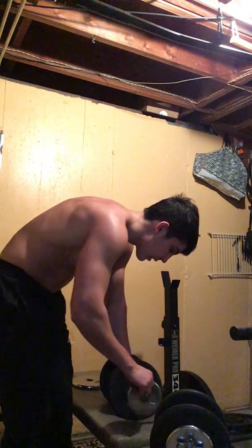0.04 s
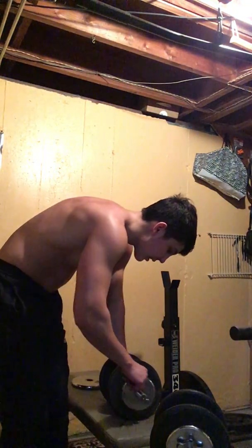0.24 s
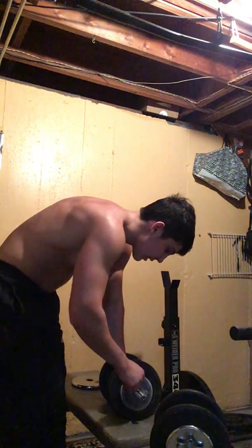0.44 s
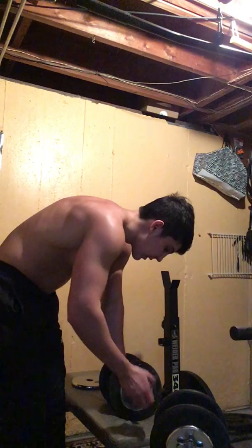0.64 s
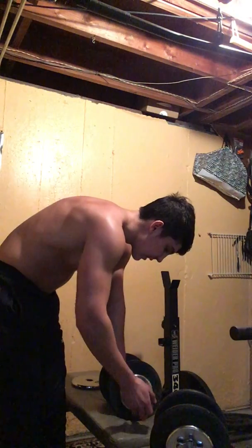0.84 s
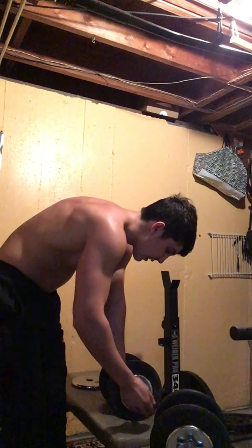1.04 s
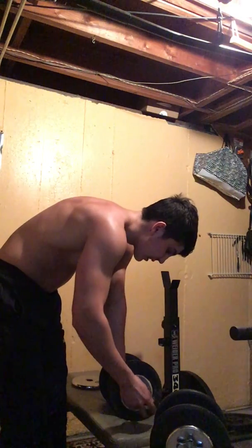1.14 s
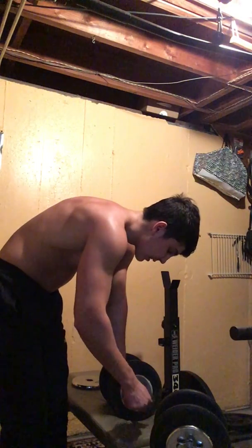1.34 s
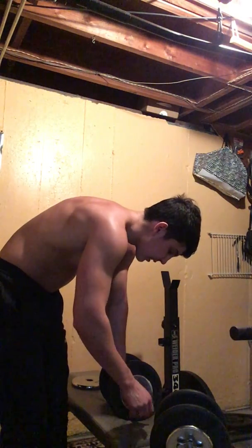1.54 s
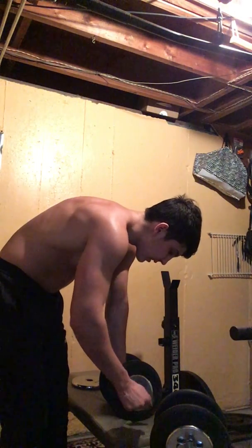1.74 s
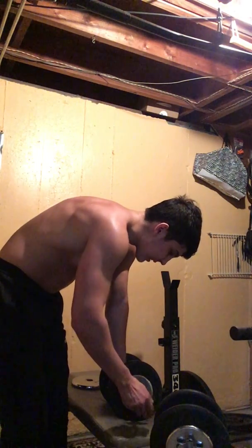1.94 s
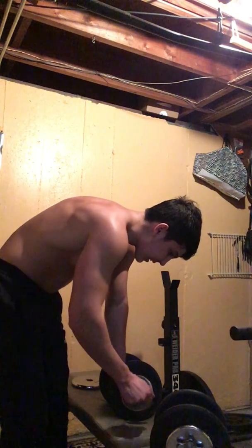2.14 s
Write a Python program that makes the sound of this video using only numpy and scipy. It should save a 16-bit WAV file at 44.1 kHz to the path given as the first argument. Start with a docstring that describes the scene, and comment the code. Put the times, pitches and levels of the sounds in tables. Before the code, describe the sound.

Metal dumbbell plate and collar knock, clank and ring, then click faintly in a small room.

```python
"""Loading a dumbbell in a basement gym.

An iron plate knocks twice on the steel handle, then the loose collar rattles against the bar end
and rings. Gripped and turned along the thread, the collar only clicks and scrapes. Each knock, clank
and click is a thud, ringing modes and a noise clack decaying in the small room. A low hum lies below."""
import sys
import numpy as np
from scipy import signal
from scipy.fft import rfft, irfft, next_fast_len
from scipy.io import wavfile
from scipy.ndimage import uniform_filter1d, minimum_filter1d, map_coordinates

SR = 44100
rng = np.random.default_rng(int(sys.argv[2]) if len(sys.argv) > 2 else 0)


def unload_wav(signal):
    """Save mono or channel-first audio to the path in sys.argv[1] as 16-bit WAV at rate SR, clipped to [-1, 1]."""
    wavfile.write(
        sys.argv[1],
        SR,
        np.round(np.clip(np.atleast_2d(signal).T, -1, 1) * 32767).astype(np.int16),
    )


N = 97020
TIME_S = np.arange(N) / SR
AGE_S = np.arange(int(SR * .7)) / SR  # time since a contact

# Contacts. Each row: start in seconds, ring, clack and thud levels in dB, tilt in dB per octave.
PLATE_KNOCKS = [(.1995, -35, -29.5, -14.5, 5), (.2985, -32, -31, -16, 3.5)]
COLLAR_CLANKS = [(0.3953, -34.5, -35, -19, 2), (.4325, -37, -40, -26, 3.5), (.4415, -33.5, -43.5, -32.5, 1),
                 (.448, -33.5, -38.5, -27.5, -1), (.4615, -40, -55.5, -31.5, 3.5),
                 (.5115, -34.5, -50, -32.5, 1.5), (.519, -33, -32, -19, 0.5),
                 (0.5275, -21.5, -30, -27, 2.5), (.584, -32, -40, -26, 0),
                 (0.6204, -36, -39.5, -29.5, -2.5)]
# Collar catching on the thread. Each row: start in seconds, clack level in dB, tilt in dB per octave.
THREAD_CLICKS = [(.913, -35.5, 1), (1.168, -41.5, 0.5), (1.204, -45, -2.5), (1.517, -44, -2.5),
                 (1.763, -42.5, -1.5), (1.8094, -43, -2.5), (1.828, -42.5, -2), (2.1129, -36.5, -2),
                 (2.172, -41.5, -1)]
# Minor contacts. Each row: start in seconds, level in dB.
RIM_TINGS = [(1.516, -56.5), (2.114, -53)]
PLATE_SHIFTS = [(0.066, -53), (1.107, -49), (1.322, -60.5), (1.378, -57.5)]
# Modes swelling at a rubbed edge. Each row: centre and half width in seconds, pitch in Hz, level in dB.
EDGE_SWELLS = [(.005, 0.037, 3655, -57.5), (0.212, 0.015, 5868, -33.5), (0.419, 0.016, 1911, -25.5),
               (0.497, 0.0065, 3655, -26), (1.215, 0.027, 1385, -51.5), (1.836, 0.031, 1380, -43.5)]

# Ringing modes and damped thud modes. Each row: frequency in Hz, gain in dB, T60 in seconds.
HANDLE_MODES = [(1321, 4.5, 0.2), (2975, -1, 0.28), (3790, -5, 0.25), (4220, -5.5, 0.28),
                (5830, -9.5, 0.29), (9470, -26.5, 0.2), (11370, -27.5, .2)]
LOOSE_MODES = [(1920, -3.5, 0.4), (3066, -7.5, 0.34), (3618, 0.5, 0.098), (3636, -1, 0.41),
               (4440, -19.5, 0.46), (5838, -17, 0.45), (5930, -13, 0.2), (6650, -24.5, 0.22),
               (7410, -25, 0.12), (8500, -22, 0.38), (11620, -33.5, 0.22), (14140, -35.5, .18)]
GRIPPED_MODES = [(1292, 0.5, 0.231), (1406, -0.5, 0.28), (1918, -4.5, 0.3), (2798, 1, 0.25),
                 (3054, 3.5, 0.16), (3680, -6, 0.12), (5880, -13, 0.089), (9370, -17, 0.12),
                 (9900, -13.5, 0.18), (15220, -22, 0.078)]
PLATE_THUD_MODES = [(648, -22, 0.058), (1560, -1.5, 0.0087)]
COLLAR_THUD_MODES = [(620, -3, .017), (1600, 2, .013), (2250, -1, .014)]

# Noise spectra. Each row: frequency in Hz, relative density in dB.
KNOCK_SPECTRUM = [(120, -25), (300, 0.5), (1400, 9), (2200, 1), (4300, -1.5), (5000, -20), (6300, -9),
                  (8500, -27), (11700, -49.5), (16000, -56)]
CLANK_SPECTRUM = [(120, -16.5), (350, -8.5), (650, 0), (1100, -8), (2200, 5), (3900, -2), (5000, -18.5),
                  (6700, -13.5), (9800, -24.5), (11500, -23.5), (16000, -45)]
CLICK_SPECTRUM = [(120, -32), (350, -1.5), (1400, 2.5), (2200, -1.5), (2900, 3.5), (4300, -0.5),
                  (5200, -7.5), (6900, -4), (8700, -19), (10500, -15), (12000, -27), (16000, -30)]
SHIFT_SPECTRUM = [(150, -10.5), (700, 1), (1500, -9.5), (2600, -41), (16000, -69)]
SCRAPE_SPECTRUM = [(300, 0.5), (800, 4), (1450, 5), (2200, -7), (3200, -7), (5000, -19), (9000, -29),
                   (15500, -48.5)]
AIR_SPECTRUM = [(20, -46), (45, -18.5), (60, -5), (160, 2.5), (320, -16), (1600, -51), (10000, -46),
                (15500, -54.5)]
RECORDER_HISS_SPECTRUM = [(7000, -6), (15500, -8.5)]

# Envelopes. Each row: time in seconds, level in dB.
SCRAPE_ENVELOPE = [(0, -61), (.1, -65), (0.159, -45), (.28, -43), (.38, -39.5), (.46, -38.5), (.5, -76),
                   (.8, -68), (1.15, -63), (1.5, -61.5), (1.73, -73.5), (1.76, -52.5), (1.89, -54.5),
                   (2.02, -46), (2.09, -55), (2.2, -53)]
RECORDER_HISS_ENVELOPE = [(.5, -76.5), (.68, -67), (.9, -64), (.92, -82.5)]
# Room hum. Each row: centre in Hz, level in dB, width in Hz.
HUM_BANDS = [(72.5, -57, 13), (154.1, -57, 6.7)]
# Room decay. Each row: frequency in Hz, T60 in seconds.
ROOM_DECAY = [(200, 0.47), (4000, 0.21), (8000, 0.15), (15000, 0.23)]

GRIP_S, GRIP_DB_PER_S = 0.71, 63  # the hand closes on the collar and damps it
GRIP_WANDER_HZ, GRIP_FLUTTER = 50, 1.8


def amp(db):
    return 10 ** (np.asarray(db) / 20)


def unit_rms(x):
    return x / np.sqrt(np.mean(x ** 2) + 1e-20)


def decay(db, t60_s):
    return amp(db - 60 * AGE_S / t60_s)


def envelope(points):
    return amp(np.interp(TIME_S, *np.transpose(points)))


def log_interp(points, hz):
    knots_hz, values = np.transpose(points)
    return np.interp(np.log(hz + 1), np.log(knots_hz + 1), values)


def add(track, start_s, sound):
    i = max(round(start_s * SR), 0)
    track[i:i + len(sound)] += sound[:N - i]


def wobble(rate_hz):
    """Smooth random curve, rate_hz knots a second."""
    steps = np.arange(0, N * rate_hz / SR + 1, 1 / 10)
    curve = map_coordinates(rng.standard_normal(2048), [steps], mode="wrap")
    return np.interp(TIME_S * rate_hz, steps, curve)


def tilt_db(hz, db_per_oct):
    """Contact brightness: a slope about 3 kHz."""
    return db_per_oct * np.log2(np.maximum(hz, 700) / 3000)


def noise(spectrum, size, db_per_oct=0):
    """Shaped noise, rms 1."""
    hz = np.fft.rfftfreq(size, 1 / SR)
    gain = amp(log_interp(spectrum, hz) + tilt_db(hz, db_per_oct))
    return unit_rms(irfft(rfft(rng.standard_normal(size)) * gain, size))


def mode_tone(hz, flutter, wander_hz=0):
    """One mode, rms 1. Reflections flutter its level and phase, faster for higher modes."""
    rate_hz = 70.2 * (hz / 3000) ** .5
    scatter = 1 + flutter * (wobble(rate_hz) + 1j * wobble(rate_hz))
    drift_cycles = wander_hz * np.cumsum(wobble(20)) / SR if wander_hz else 0
    phase_rad = 2 * np.pi * (hz * TIME_S + drift_cycles) + 0.49 * wobble(2 * rate_hz)
    return unit_rms(np.real(scatter * np.exp(1j * phase_rad)))


def room_decay(x):
    """Each frequency dies at the room's T60."""
    hz, time_s, bins = signal.stft(x, SR, nperseg=256)
    fade = amp(-60 * time_s / log_interp(ROOM_DECAY, hz)[:, None])
    return signal.istft(bins * fade, SR, nperseg=256)[1][:len(x)]


def strikes(contacts, modes, spectrum, thud_modes, flutter, rise_s=0.0017, wander_hz=0, burst_db=None):
    """Each contact feeds energy to the modes, clacks into the room and thuds briefly."""
    impacts, energies = np.zeros(N), np.zeros((len(modes), N))
    hardest_db = max(row[1] for row in contacts)
    rise = 1 - np.exp(-AGE_S / rise_s)
    for start_s, ring_db, clack_db, thud_db, db_per_oct in contacts:
        burst = 0  # early overshoot of the ring, larger for harder blows
        if burst_db is not None:
            burst = decay(burst_db + 0.44 * (ring_db - hardest_db), t60_s=0.017)
        for energy, (hz, db, t60_s) in zip(energies, modes):
            ring = decay(ring_db + db + tilt_db(hz, db_per_oct), t60_s)
            add(energy, start_s, ((1 + burst) * rise * ring) ** 2)
        clack = room_decay(noise(spectrum, len(AGE_S), db_per_oct)) * rise
        thud = 0
        for hz, db, t60_s in thud_modes:
            phase_rad = 2 * np.pi * hz * AGE_S
            detune = rng.normal(1, .05)
            thud += decay(db, t60_s) * np.tanh(phase_rad) * np.sin(detune * phase_rad)
        add(impacts, start_s, amp(clack_db) * clack + amp(thud_db) * thud)
    tones = [mode_tone(hz, flutter, wander_hz) for hz, _, _ in modes]
    return impacts + sum(np.sqrt(energy) * tone for energy, tone in zip(energies, tones))


def plate_knocks():
    """The plate meets the handle with a dry tock; ring and room bloom just after."""
    return strikes(PLATE_KNOCKS, HANDLE_MODES, KNOCK_SPECTRUM, PLATE_THUD_MODES,
                   flutter=2.9, rise_s=0.0073)


def loose_collar(crack_hz=3560):
    """The collar bounces on the bar and rings until gripped. Only a hard blow cracks sharply."""
    out = strikes(COLLAR_CLANKS, LOOSE_MODES, CLANK_SPECTRUM, COLLAR_THUD_MODES,
                  flutter=0.58, burst_db=16)
    hardest_db = max(row[1] for row in COLLAR_CLANKS)
    for start_s, ring_db, *_ in COLLAR_CLANKS:
        crack_db = -5 + 2 * (ring_db - hardest_db)
        add(out, start_s, decay(crack_db, t60_s=.022) * np.sin(2 * np.pi * crack_hz * AGE_S))
    return out * amp(-GRIP_DB_PER_S * np.maximum(TIME_S - GRIP_S, 0))


def gripped_collar(ring_gain_db=-8, thud_gain_db=1.5, ting_hz=10070):
    """The hand-damped collar clicks. Its modes shift with the grip; its rim tings twice."""
    contacts = [(start_s, db + ring_gain_db, db, db + thud_gain_db, db_per_oct)
                for start_s, db, db_per_oct in THREAD_CLICKS]
    out = strikes(contacts, GRIPPED_MODES, CLICK_SPECTRUM, COLLAR_THUD_MODES,
                  flutter=GRIP_FLUTTER, wander_hz=GRIP_WANDER_HZ)
    for start_s, db in RIM_TINGS:
        add(out, start_s, decay(db, t60_s=0.2) * np.sin(2 * np.pi * ting_hz * AGE_S))
    return out


def plate_shifts(rise_s=0.0018):
    """The plate shifts on the handle with soft, dull clunks."""
    out = np.zeros(N)
    rise = 1 - np.exp(-AGE_S / rise_s)
    for start_s, db in PLATE_SHIFTS:
        add(out, start_s, amp(db) * rise * room_decay(noise(SHIFT_SPECTRUM, len(AGE_S))))
    return out


def sliding(grain_db=1.8, ring_gain_db=-10):
    """Metal scrapes on metal and stirs the gripped collar's modes. A rubbed edge makes one mode sing."""
    modes = sum(amp(db) * mode_tone(hz, GRIP_FLUTTER, GRIP_WANDER_HZ) for hz, db, _ in GRIPPED_MODES)
    ring = amp(ring_gain_db) * (TIME_S > GRIP_S) * unit_rms(modes)
    friction = noise([(100, -15)] + SCRAPE_SPECTRUM, N)
    grain = amp(grain_db * (wobble(59.796) + wobble(400)))
    out = envelope(SCRAPE_ENVELOPE) * (unit_rms(friction * grain) + ring)
    for centre_s, half_width_s, hz, db in EDGE_SWELLS:
        swell = np.exp(-((TIME_S - centre_s) / half_width_s) ** 2)
        out += amp(db) * swell * mode_tone(hz, flutter=0.2)
    return out


def room_tone(air_db=-54.5):
    """Low wavering hum over the room's air."""
    hum = np.zeros(N)
    for hz, db, width_hz in HUM_BANDS:
        waver = wobble(2 * width_hz) + 1j * wobble(2 * width_hz)
        hum += amp(db) * unit_rms(np.real(waver * np.exp(2j * np.pi * hz * TIME_S)))
    return hum + amp(air_db) * noise(AIR_SPECTRUM, N)


def recorder_hiss():
    """Faint treble hiss from the recorder swells and cuts off at 0.9 s."""
    return envelope(RECORDER_HISS_ENVELOPE) * noise(RECORDER_HISS_SPECTRUM, N)


def scene():
    """All sources, mono."""
    return (plate_knocks() + loose_collar() + gripped_collar() + plate_shifts()
            + sliding() + room_tone() + recorder_hiss())[None]


def record(dry):
    """Fast peak limiter, third-order low cut, hard band limit."""
    ceiling, limiter_s = .56, .002
    low_cut_hz, top_hz = 32, 15750
    window = int(limiter_s * SR)
    needed_gain = ceiling / np.maximum(np.abs(dry), ceiling)
    gain = uniform_filter1d(minimum_filter1d(needed_gain, 2 * window), window)
    size = next_fast_len(N + 8192)
    hz = np.fft.rfftfreq(size, 1 / SR)
    low_cut = (hz / low_cut_hz) ** 3 / np.sqrt(1 + (hz / low_cut_hz) ** 6)
    return irfft(rfft(dry * gain, size) * low_cut * (hz < top_hz), size)[..., :N]


dry = scene()
out = record(dry)
unload_wav(out)
```